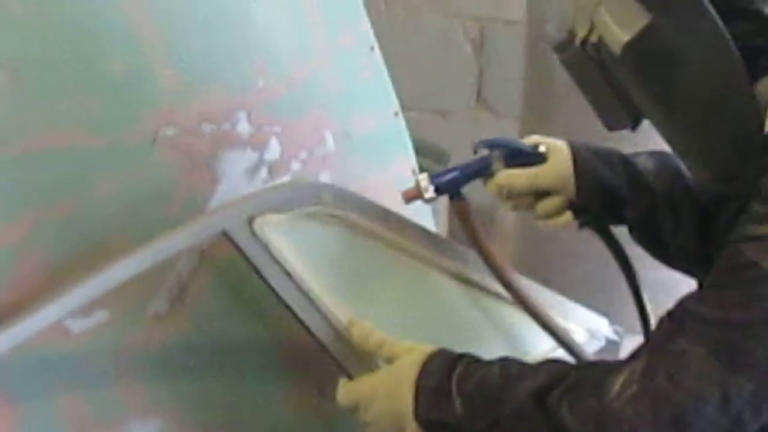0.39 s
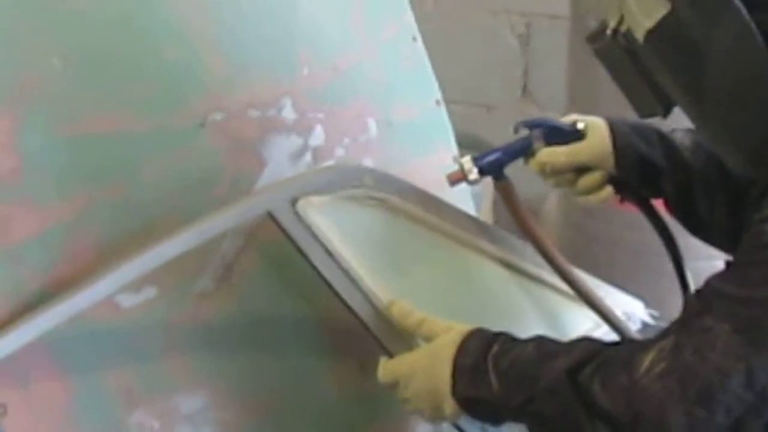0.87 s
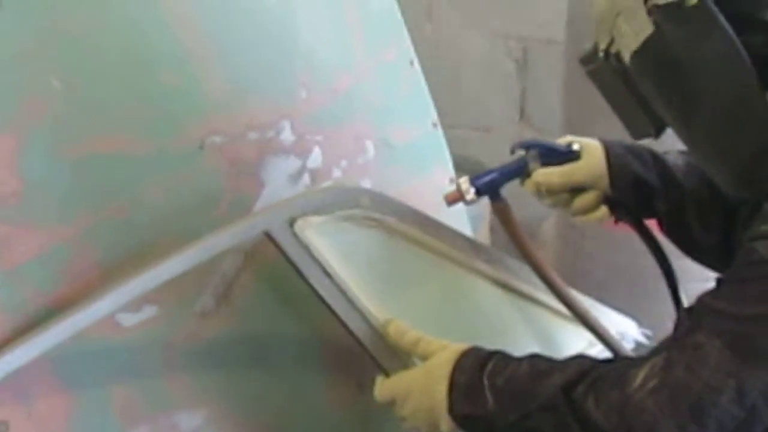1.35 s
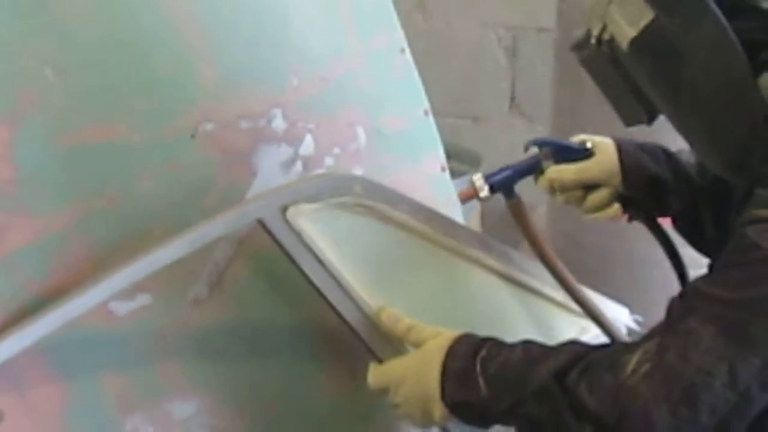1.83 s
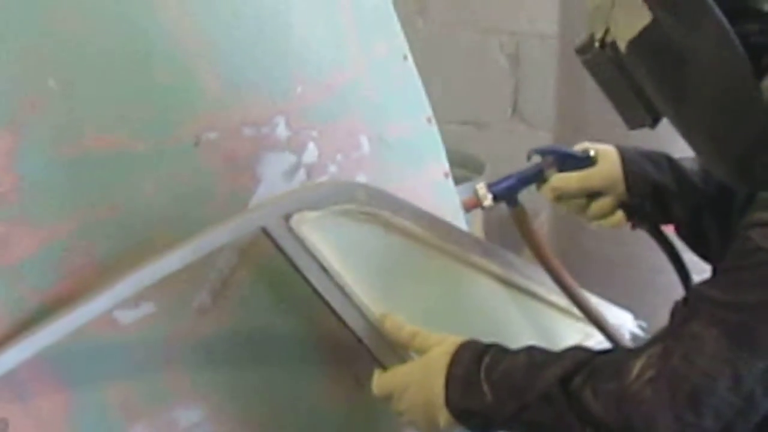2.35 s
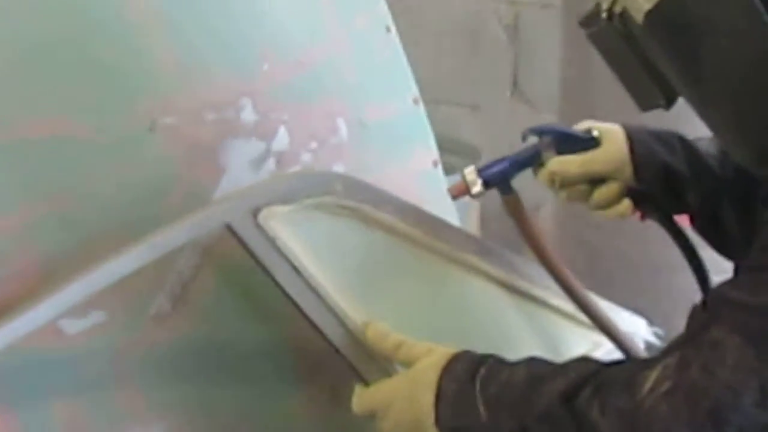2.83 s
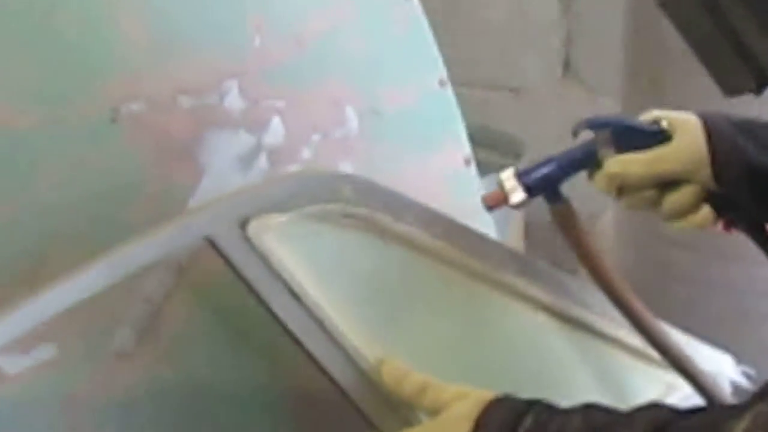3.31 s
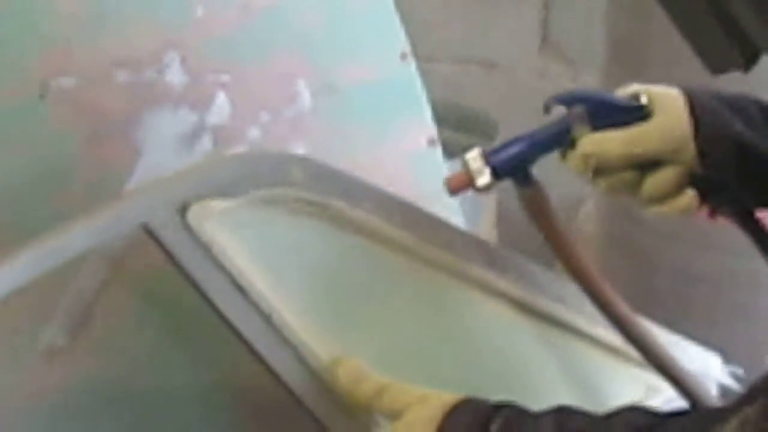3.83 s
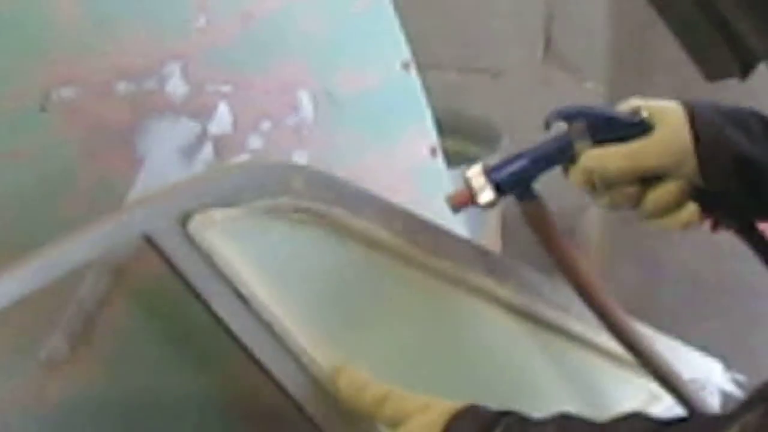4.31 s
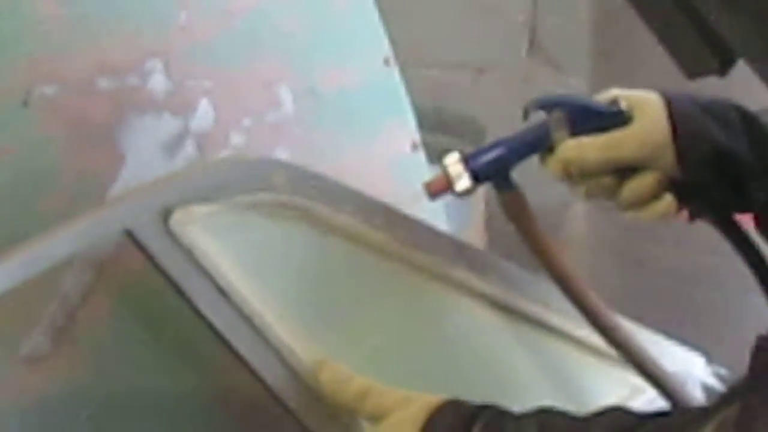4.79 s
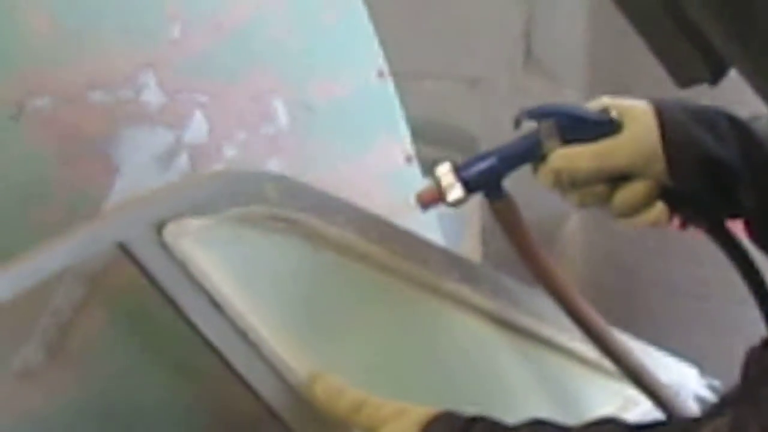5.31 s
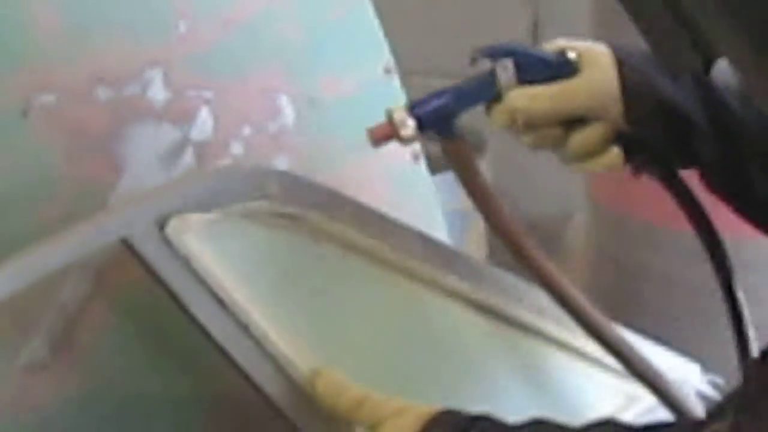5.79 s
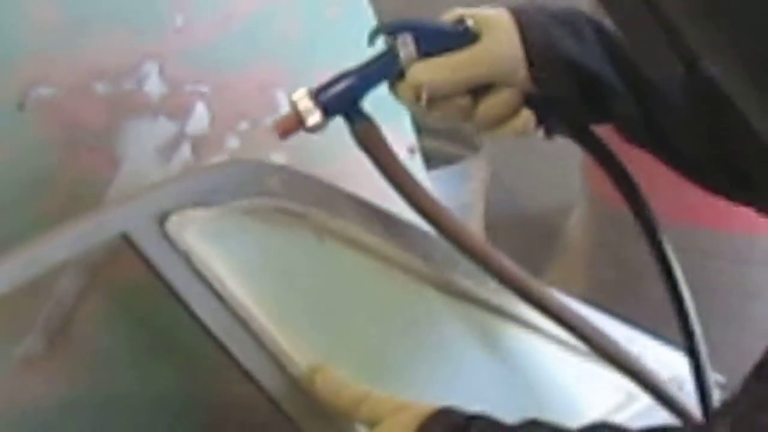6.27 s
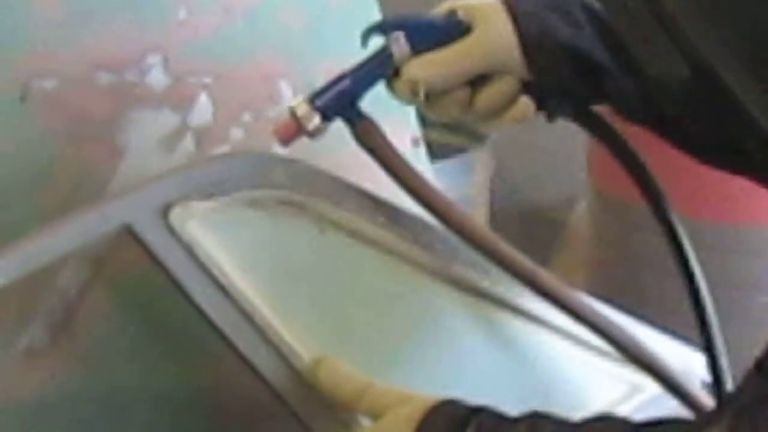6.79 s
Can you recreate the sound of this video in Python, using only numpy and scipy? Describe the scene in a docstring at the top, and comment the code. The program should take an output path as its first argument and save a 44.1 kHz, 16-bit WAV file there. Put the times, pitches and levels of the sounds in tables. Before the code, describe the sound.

Unbroken compressed-air and grit noise, concentrated in the upper mids, fills a hard-surfaced workshop. The jet flutters and surges irregularly, with individual grit hits fused into a gritty rush. Faint metallic resonances colour the middle stretch, then the blast grows louder and narrower near the end. Low spent air and a steady machine hum sit far beneath. Close, nearly mono pickup, saturated and limited in bass.

```python
"""A hand-held grit gun blasts a sheet-metal panel in a hard-walled room: jet noise with dense grit hits.
It starts aimed high; near 1 s it swings low, where the panel modes, rung by the grit, are loudest.
Near 5.5 s it moves to the near position; each position has its own noise colour and surges all along.
Spent air roars below the jet and a compressor hums faintly, as steady sines, from start to end.
The small microphone is overdriven: limited, saturated and rolled off, with two close ports."""
import sys
import numpy as np
from scipy import signal
from scipy.fft import rfft, irfft, next_fast_len
from scipy.io import wavfile

SR = 44100
rng = np.random.default_rng(int(sys.argv[2]) if len(sys.argv) > 2 else 0)


def transcribe(u):
    """Save the signal u as a 16-bit wav file named by the first command-line argument.

    u: samples, shape (n,) or (channels, n), limited to [-1, 1]; the rate is SR.
    q: integer samples, one column per channel.
    """
    v = np.clip(np.atleast_2d(u).T, -1, 1)
    q = np.round(v * 32767).astype(np.int16)
    wavfile.write(sys.argv[1], SR, q)


def volts_from_decibels(level):
    """Turn decibel levels (scalar or array-like) into linear amplitude factors."""
    exponent = np.asarray(level, float) / 20
    return 10 ** exponent


N = 303849

# Edges between roar, panel rush, jet core, edge, sizzle and top: (frequency [Hz])
PART_EDGES_HZ = [2200, 3800, 5000, 6400, 10500]
# Blast colour after the mic roll-off, relative within each part: (frequency [Hz], density [dB per Hz])
AIM_HIGH_COLOUR = [(1060, -44), (1800, -17), (2270, -6), (2470, -3), (2850, -2), (4090, -4), (4500, 2.5),
                   (4950, 1), (5700, -2.5), (6350, -8.5), (9520, -23), (11800, -36.5), (15500, -40)]
AIM_LOW_COLOUR = [(1060, -44), (1800, 7), (2380, -15.5), (2580, -7.5), (3260, -10.5), (3800, -6), (4090, 0),
                  (4980, -0.5), (5600, -1), (6700, -8.5), (7470, -10), (8100, -15), (9270, -16.5),
                  (11500, -27.5), (15500, -36)]
AIM_NEAR_COLOUR = [(1060, -45), (1800, -26), (2320, -12), (2900, -5.5), (3940, -5.5), (4470, 5),
                   (4850, 4.5), (5400, -2), (7080, -9), (7670, -16.5), (9790, -20.5), (12000, -35.5),
                   (15500, -38.5)]
# Gun moves, high to low and low to near: (start [s], end [s])
GUN_MOVES = [(.95, 1.52), (5.45, 5.65)]
# Jet core level as air and grit surge and sag in the hose: (time [s], level [dB])
JET_FLOW = [(0.0, -16.5), (0.33, -13), (0.75, -16.5), (1.25, -18.5), (1.4, -18), (1.6, -19), (1.97, -18.5),
            (2.15, -17), (2.43, -16.5), (2.74, -21), (3.0, -14.5), (3.35, -21), (3.52, -18.5), (3.66, -21),
            (3.82, -19), (4.05, -22.5), (4.22, -15), (4.36, -14.5), (4.54, -19.5), (4.78, -17.5),
            (4.95, -20.5), (5.13, -16), (5.32, -22.5), (5.55, -15.5), (5.78, -16.5), (5.95, -13.5),
            (6.4, -13.5), (6.52, -15), (6.7, -12), (6.89, -15.5)]
# Panel rush against the jet core: (time [s], level [dB])
RUSH_LEVEL = [(0.0, -5), (0.5, -5), (1.35, -5.5), (2.1, -6.5), (3.25, -5), (3.5, -7.5), (4.1, -7),
              (5.05, -7), (5.52, -8), (5.7, -2), (5.95, -3.5), (6.4, -7.5), (6.75, -7.5), (6.89, -4)]
# Parts against the jet core: (high [dB], low [dB], near [dB], lean [dB per dB of surge])
EDGE_LEVEL = (-0.17, 0.17, -1.1, 0.44)
SIZZLE_LEVEL = (-8, -7, -10, 0.6)
TOP_LEVEL = (-24.5, -25, -24.5, 0.12)
ROAR_LEVEL = (-14.5, -13.5, -12, -0.56)
# Panel modes with the gun low: (frequency [Hz], bandwidth [Hz], level against the jet core [dB])
PANEL_MODES = [(2633, 46, -18.5), (2830, 28, -18), (3005, 61, -20), (3514, 30, -15), (3830, 48, -15),
               (4044, 30, -21), (4176, 32, -9.5), (4520, 11, -9.5), (4733, 35, -8.5), (5300, 27, -16.5),
               (5480, 22, -16)]
# Relative colour of the roar: (frequency [Hz], level [dB])
ROAR_COLOUR = [(15, -46), (30, -19), (70, -13), (139, -11), (473, -4.5), (573, 0.5), (1870, 6.5), (2400, 7),
               (3120, -30), (5280, -120)]
# Compressor hum ahead of the input gain: (multiple of the beat [1], level [dB rms])
HUM_MULTIPLES = [(2, -61), (3, -54.5), (4, -54), (6, -47), (7, -60), (8, -47.5)]
# How much of the stereo difference is kept, by frequency: (frequency [Hz], gain [dB])
SIDE_KEPT = [(3000, -60), (3600, -12), (4100, -2), (9700, -2), (10400, -6), (11200, -22), (15000, -22)]

GRIT_PER_S, GRIT_SPREAD_DB, GRIT_DB = 6000, 2.5, -14.5   # GRIT_DB: against unit-rms air noise
ECHO_DB, ECHO_T60_S = -11.5, 0.18
PATCHY_DB, PATCHY_RATE_HZ = 1.05, 11.4
FLARE_DB, FLARE_RATE_HZ = 0.49, 5
PANEL_AWAY_DB, MODE_SWELL_DB, MODE_SWELL_RATE_HZ = -3.5, 2, 2
DEEP_ROAR_TOP_HZ = 556
DEEP_ROAR_DB_PER_SURGE_DB, UPPER_ROAR_DB_PER_RUSH_DB = 0.17, 0.66
COMPRESSOR_BEAT_HZ, HUM_WANDER_DB, HUM_WANDER_RATE_HZ = 97.4, 0.33, 0.9
INPUT_GAIN_DB, LIMIT, SATURATION = 1.5, 0.45, 1.2
MIC_CUT_HZ, BASS_CUT_HZ = 4800, 46
PORT_LAG_S, PORT_APART_DB = 7.5e-6, -33.5   # both ahead of SIDE_KEPT


def rms_one(x):
    """Scales to unit rms."""
    return x / np.sqrt(np.mean(x ** 2) + 1e-20)


def in_time(rows):
    """Interpolates a two-column table to one value per sample."""
    time_s, value = np.transpose(rows)
    return np.interp(np.arange(N) / SR, time_s, value)


def at_hz(points, hz):
    """Interpolates a table over log frequency."""
    table_hz, db = np.transpose(points)
    return np.interp(np.log(hz + 1), np.log(table_hz), db)


def drift(rate_hz):
    """Random wander of unit rms: noise through a double pole, at every 40th sample."""
    r = np.exp(-2 * np.pi * rate_hz * 40 / SR)
    noise = rng.standard_normal(N // 40 + 2002)
    slow = signal.lfilter([1], [1, -2 * r, r * r], noise)[2000:]
    return np.interp(np.arange(N) / 40, np.arange(len(slow)), rms_one(slow))


def fft_grid():
    """FFT size and its bin frequencies."""
    size = next_fast_len(N)
    return size, np.arange(size // 2 + 1) * SR / size


def grit_stream():
    """Turbulent air as white noise, plus dense grit impacts of uneven size and random sign."""
    sizes = volts_from_decibels(GRIT_SPREAD_DB * np.minimum(rng.exponential(1, N), 5))
    impacts = sizes * rng.choice([-1, 1], N) * (rng.random(N) < GRIT_PER_S / SR)
    return rng.standard_normal(N) + volts_from_decibels(GRIT_DB) * rms_one(impacts)


def aim_shares():
    """Amplitude share of each gun position, at equal power through a move."""
    time_s = np.arange(N) / SR
    left_high, reached_near = [np.interp(time_s, move, [0, 1]) for move in GUN_MOVES]
    power = [1 - left_high, left_high - reached_near, reached_near]
    return np.sqrt(np.clip(power, 0, 1))


def part_db(level, shares, surge_db):
    """A part's level follows the gun position, leans with the surge and flares at random."""
    position_db = np.array(level[:3]) @ shares ** 2
    return position_db + level[3] * surge_db + FLARE_DB * drift(FLARE_RATE_HZ)


def room(size):
    """Room spectrum: direct sound plus decaying noise as dense close echoes, a fine ripple in frequency."""
    time_s = np.arange(SR // 4) / SR
    tail = rng.standard_normal(len(time_s)) * volts_from_decibels(-60 * time_s / ECHO_T60_S)
    response = volts_from_decibels(ECHO_DB) * rms_one(tail) / np.sqrt(len(time_s))
    response[0] += 1
    return rfft(response, size)


def patchy(hz, spectrum, size):
    """Sixth-octave bands, in three interleaved sets, swell and fade by set as the hand wanders."""
    band_set = np.floor(np.log2(hz / 1000 + 1e-9) * 6).astype(int) % 3
    out = np.zeros(N)
    for k in range(3):
        band = irfft(spectrum * (band_set == k), size)[:N]
        out += volts_from_decibels(PATCHY_DB * drift(PATCHY_RATE_HZ)) * band
    return out


def blast(shares, levels_db):
    """Panel rush, jet core and treble: grit streams coloured by gun position and room."""
    size, hz = fft_grid()
    part = np.digitize(hz, PART_EDGES_HZ)
    # colours hold after the mic roll-off, so undo it here, down to a floor
    mic_gain = abs(signal.sosfreqz(mic_roll_off(), hz, fs=SR)[1])
    mic_gain = np.maximum(mic_gain, volts_from_decibels(-33.5))
    out = np.zeros(N)
    for share, colour in zip(shares, [AIM_HIGH_COLOUR, AIM_LOW_COLOUR, AIM_NEAR_COLOUR]):
        heard = rfft(grit_stream(), size) * volts_from_decibels(at_hz(colour, hz)) * room(size)
        for k, level_db in enumerate(levels_db, 1):   # part 0 belongs to the roar
            piece = heard * (part == k)
            rms = np.sqrt(2 * np.sum(abs(piece) ** 2) / (size * N))   # after the mic
            out += share * volts_from_decibels(level_db) * irfft(piece / mic_gain, size)[:N] / rms
    return patchy(hz, rfft(out, size), size)


def resonance(x, hz, width_hz):
    """Two-pole resonator with zeros at DC and Nyquist."""
    r = np.exp(-np.pi * width_hz / SR)
    return signal.lfilter([1, 0, -1], [1, -2 * r * np.cos(2 * np.pi * hz / SR), r * r], x)


def panel(low_share):
    """A grit stream keeps each panel mode ringing; each swells as the spot moves."""
    stream = grit_stream()
    modes = np.zeros(N)
    for hz, width_hz, level_db in PANEL_MODES:
        swell_db = MODE_SWELL_DB * drift(MODE_SWELL_RATE_HZ)
        modes += volts_from_decibels(level_db + swell_db) * rms_one(resonance(stream, hz, width_hz))
    return modes * volts_from_decibels(PANEL_AWAY_DB * (1 - low_share))


def roar(deep_db, upper_db):
    """Spent air: smooth low noise, its deep and upper parts swelling separately."""
    size, hz = fft_grid()
    spectrum = rfft(rng.standard_normal(size)) * volts_from_decibels(at_hz(ROAR_COLOUR, hz))
    spectrum = spectrum * (hz < PART_EDGES_HZ[0])
    deep = irfft(spectrum * (hz < DEEP_ROAR_TOP_HZ), size)[:N]
    upper = irfft(spectrum * (hz >= DEEP_ROAR_TOP_HZ), size)[:N]
    return (volts_from_decibels(deep_db) * deep + volts_from_decibels(upper_db) * upper) / np.std(deep + upper)


def compressor():
    """Sines at multiples of the compressor's beat, steady in pitch, wandering slightly in level."""
    beat_phase = 2 * np.pi * COMPRESSOR_BEAT_HZ * np.arange(N) / SR
    hum = np.zeros(N)
    for multiple, level_db in HUM_MULTIPLES:
        gain = np.sqrt(2) * volts_from_decibels(level_db + HUM_WANDER_DB * drift(HUM_WANDER_RATE_HZ))
        hum += gain * np.sin(int(multiple) * beat_phase + rng.uniform(0, 2 * np.pi))
    return hum


def scene():
    """Sums blast, panel and roar, scales them by the jet flow and adds the compressor."""
    jet_db, rush_db = in_time(JET_FLOW), in_time(RUSH_LEVEL)
    surge_db = jet_db - np.mean(jet_db)
    shares = aim_shares()
    treble_db = [part_db(v, shares, surge_db) for v in (EDGE_LEVEL, SIZZLE_LEVEL, TOP_LEVEL)]
    gun = blast(shares, [rush_db, 0, *treble_db])   # jet core at 0 dB
    gun += panel(shares[1])
    deep_db = DEEP_ROAR_DB_PER_SURGE_DB * surge_db
    upper_db = UPPER_ROAR_DB_PER_RUSH_DB * (rush_db - np.mean(rush_db))
    gun += volts_from_decibels(part_db(ROAR_LEVEL, shares, surge_db)) * roar(deep_db, upper_db)
    return np.tile(volts_from_decibels(jet_db) * gun + compressor(), (2, 1))


def mic_roll_off():
    """Second-order low-pass of the small microphone."""
    return signal.butter(2, MIC_CUT_HZ, fs=SR, output="sos")


def input_stage(x):
    """Overdrive: a limiter on the instantaneous envelope, then tanh saturation."""
    loud = volts_from_decibels(INPUT_GAIN_DB) * x
    over = abs(signal.hilbert(loud, next_fast_len(N))[:N]) / LIMIT + 1e-9
    held = loud * np.tanh(over) / over
    return SATURATION * np.tanh(held / SATURATION)


def port_difference(mid):
    """Half the difference between two close ports: a tiny lag, as a slope, plus treble noise."""
    band = signal.butter(2, [5500, 9500], "band", fs=SR, output="sos")
    noise = signal.sosfilt(band, rng.standard_normal(N))
    side = PORT_LAG_S / 2 * SR * np.gradient(mid)
    return side + volts_from_decibels(PORT_APART_DB) * rms_one(noise) * np.std(mid)


def keep_side(side):
    """Keeps the stereo difference mainly between 4 and 10 kHz, with steep edges."""
    hz = np.arange(N // 2 + 1) * SR / N
    return irfft(rfft(side) * volts_from_decibels(at_hz(SIDE_KEPT, hz)), N)


def top_cut(x):
    """Nothing passes above the cut-off."""
    return signal.sosfilt(signal.butter(12, 15760, fs=SR, output="sos"), x)


def record(dry):
    """Overdrives the input, rolls off both ends and adds a band-limited stereo difference."""
    mid = signal.sosfilt(mic_roll_off(), input_stage(dry[0]))
    mid = signal.sosfilt(signal.butter(2, BASS_CUT_HZ, "high", fs=SR, output="sos"), mid)
    side = keep_side(port_difference(mid))
    return top_cut(np.array([mid + side, mid - side]))


dry = scene()
out = record(dry)
transcribe(out)
```